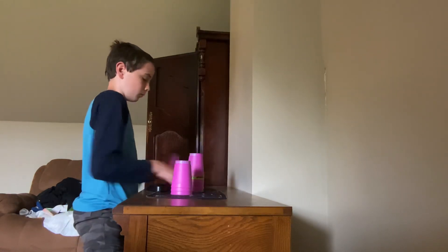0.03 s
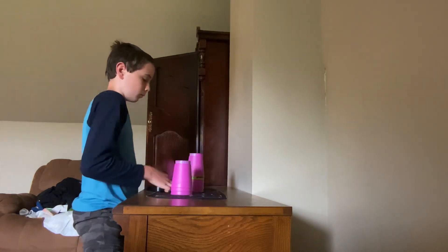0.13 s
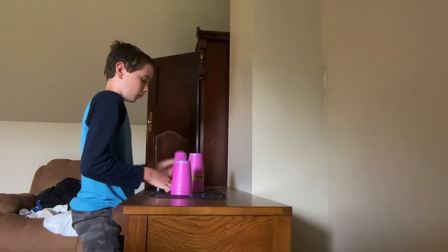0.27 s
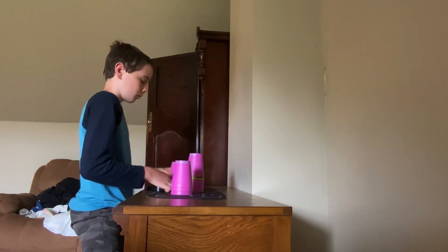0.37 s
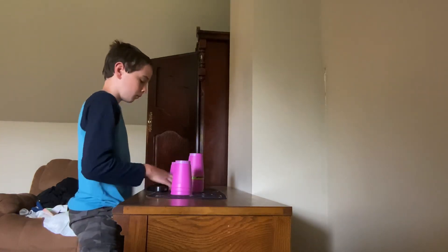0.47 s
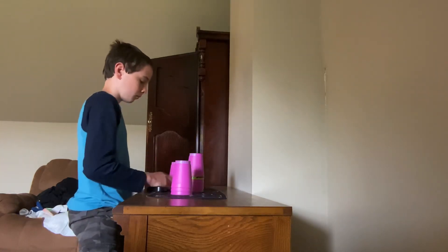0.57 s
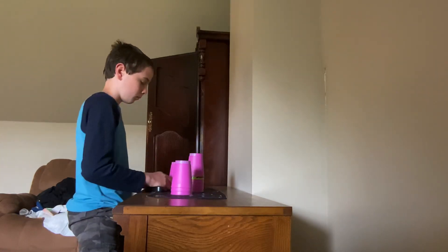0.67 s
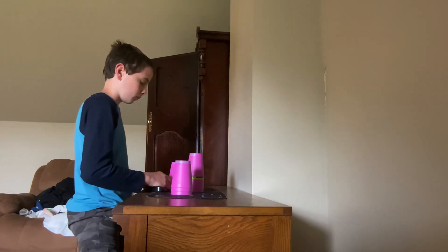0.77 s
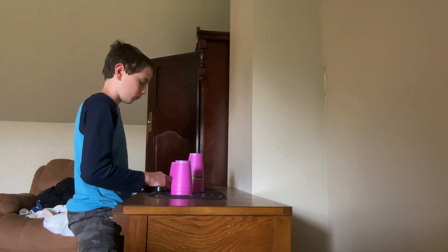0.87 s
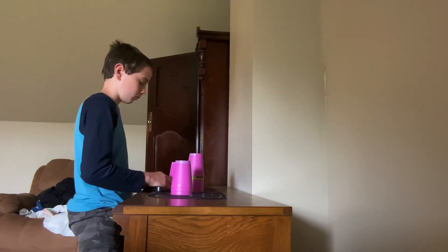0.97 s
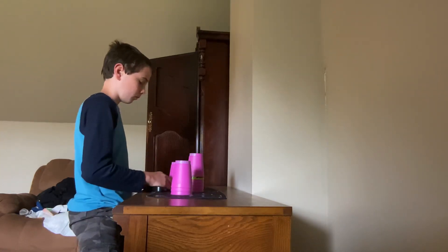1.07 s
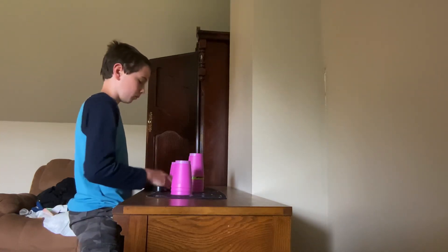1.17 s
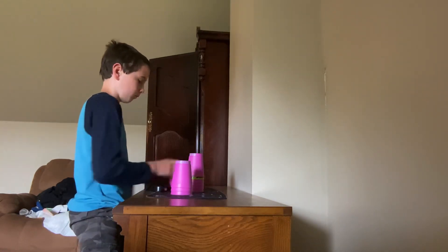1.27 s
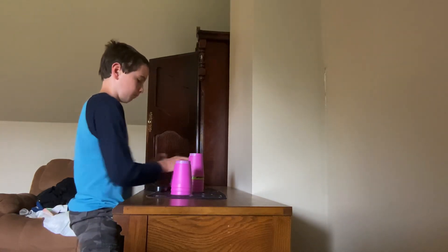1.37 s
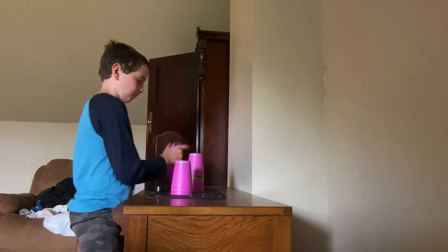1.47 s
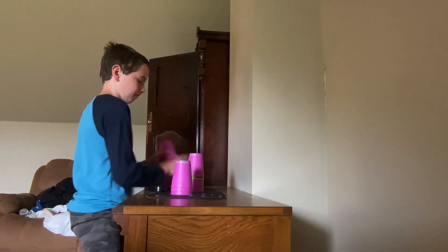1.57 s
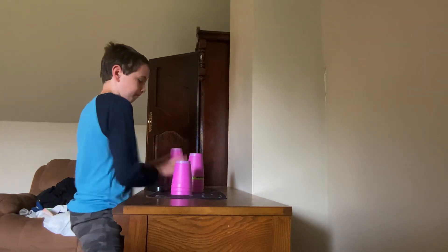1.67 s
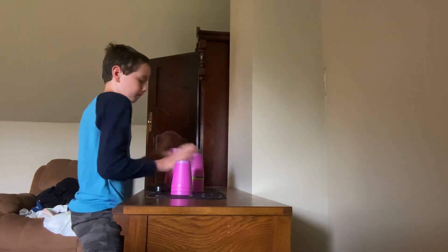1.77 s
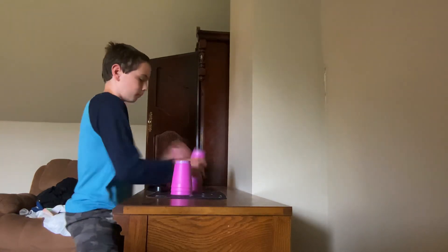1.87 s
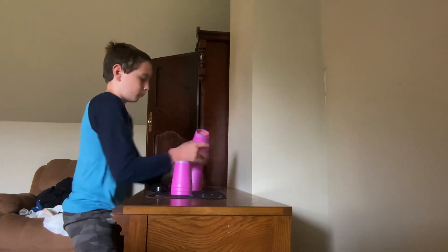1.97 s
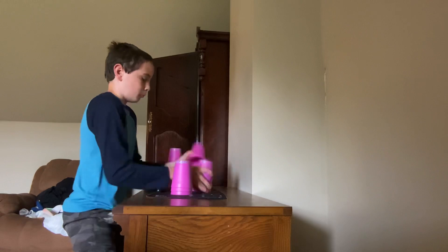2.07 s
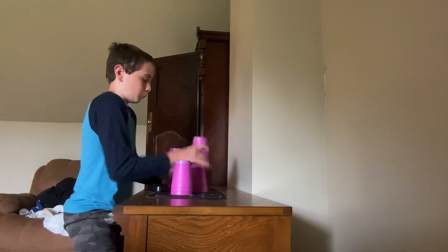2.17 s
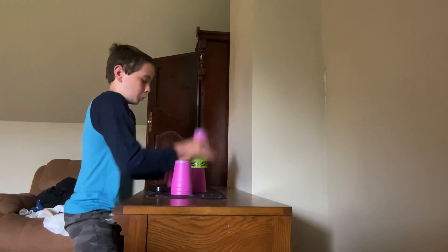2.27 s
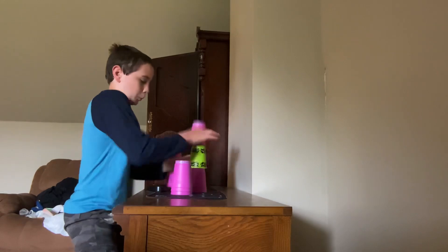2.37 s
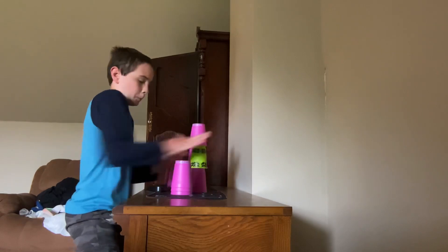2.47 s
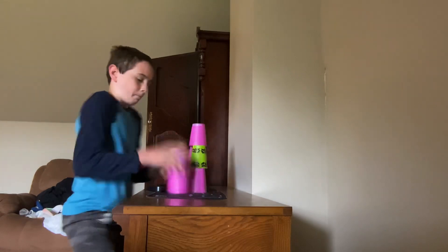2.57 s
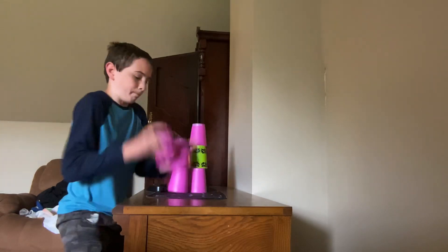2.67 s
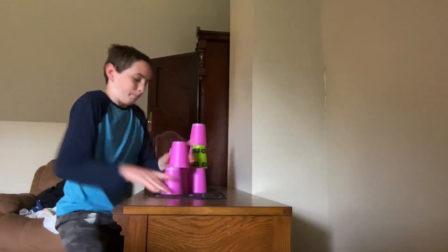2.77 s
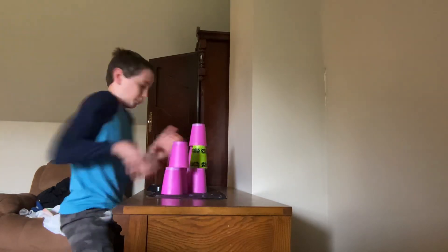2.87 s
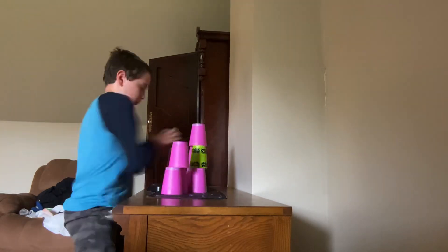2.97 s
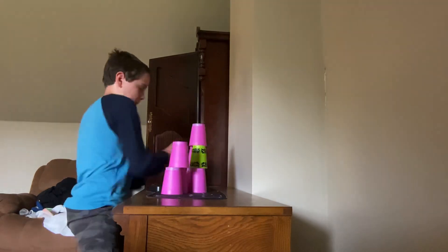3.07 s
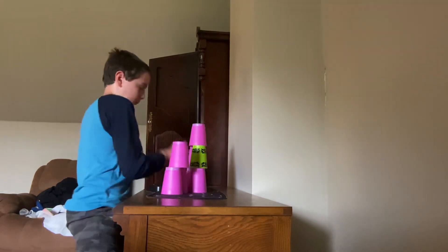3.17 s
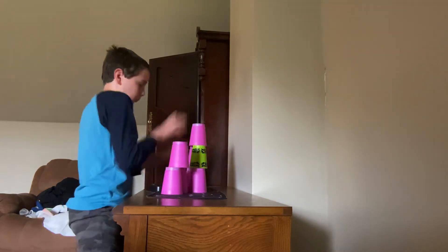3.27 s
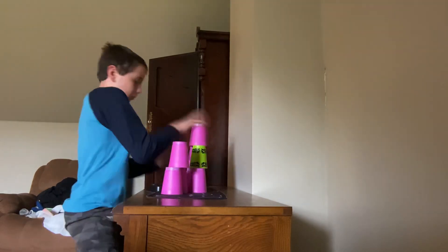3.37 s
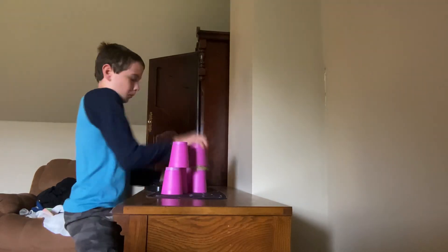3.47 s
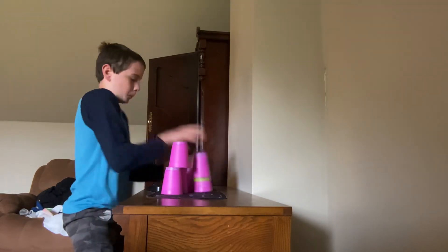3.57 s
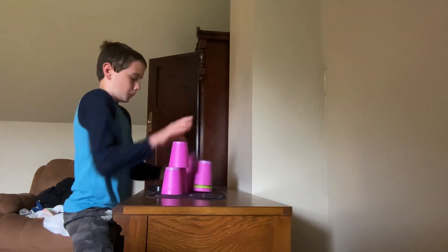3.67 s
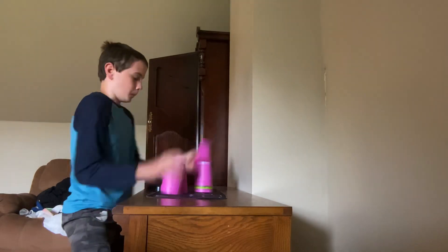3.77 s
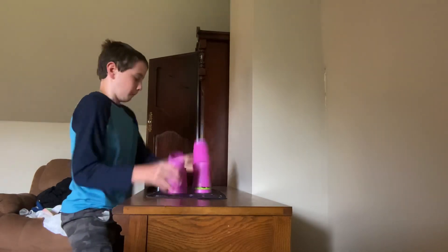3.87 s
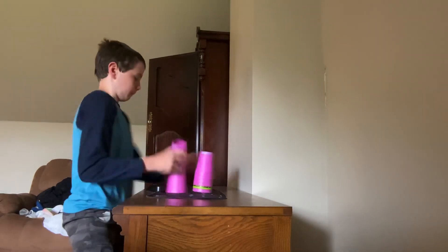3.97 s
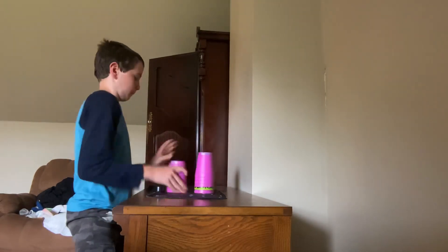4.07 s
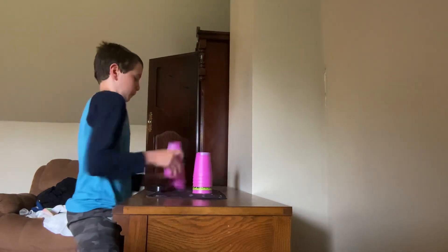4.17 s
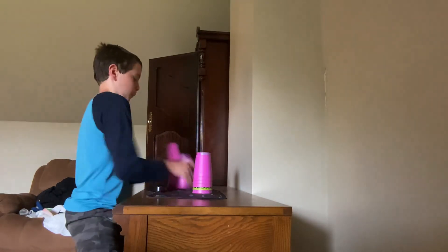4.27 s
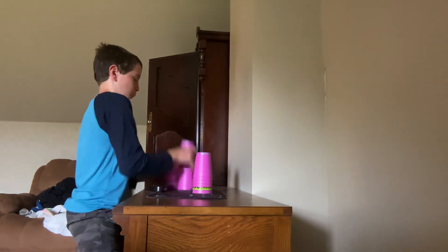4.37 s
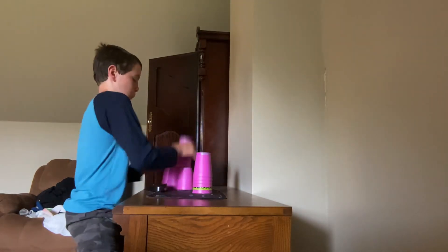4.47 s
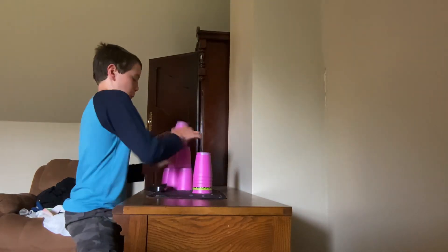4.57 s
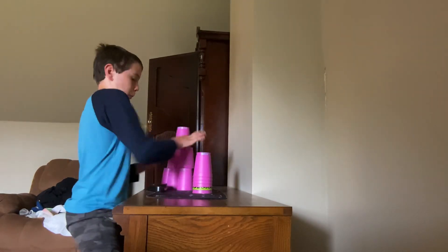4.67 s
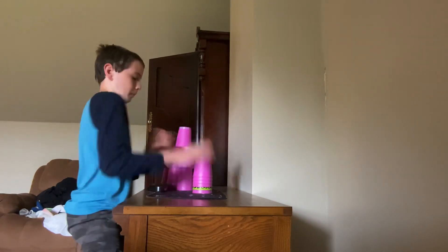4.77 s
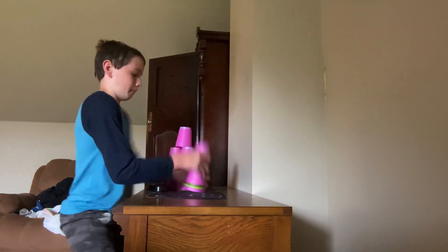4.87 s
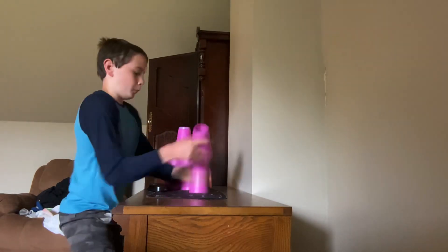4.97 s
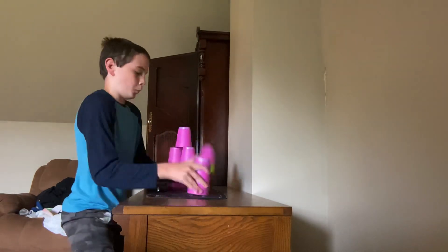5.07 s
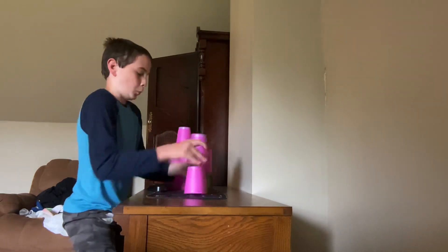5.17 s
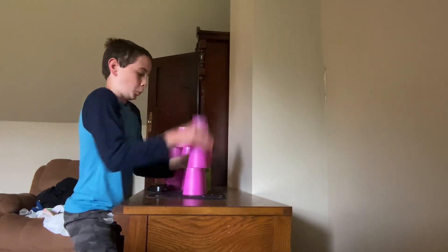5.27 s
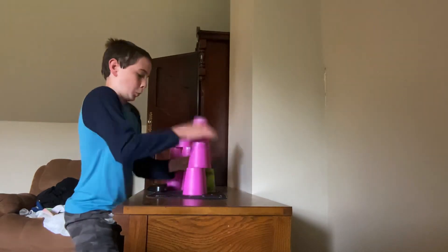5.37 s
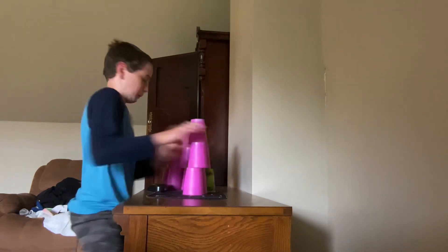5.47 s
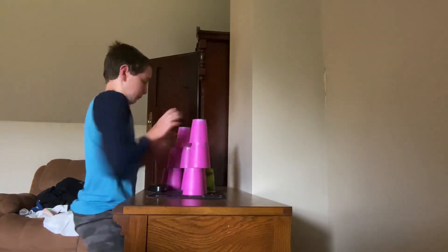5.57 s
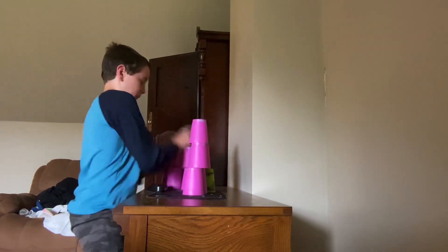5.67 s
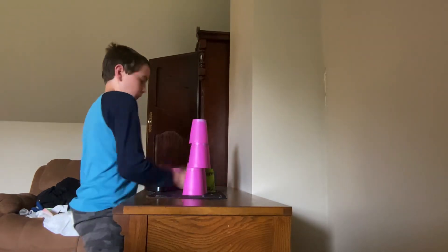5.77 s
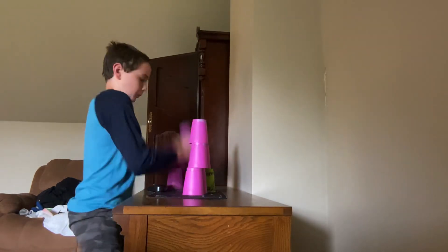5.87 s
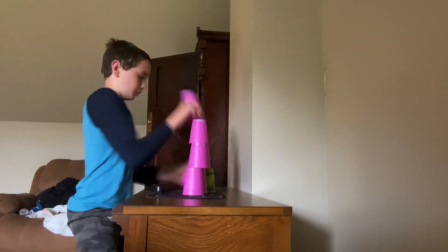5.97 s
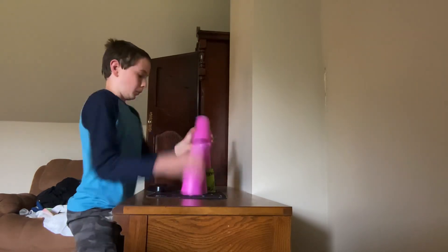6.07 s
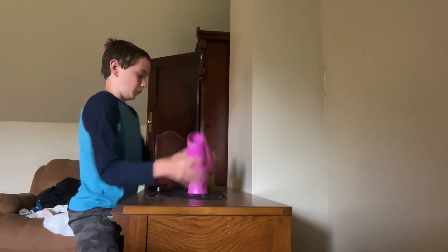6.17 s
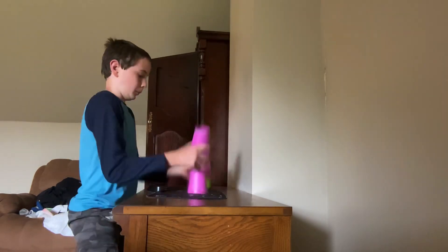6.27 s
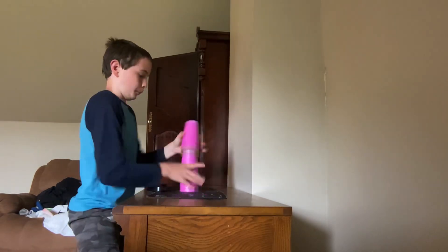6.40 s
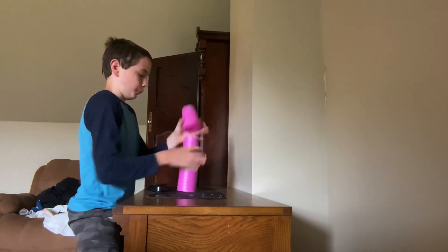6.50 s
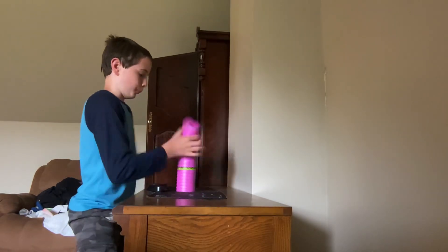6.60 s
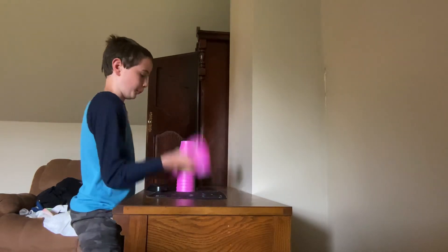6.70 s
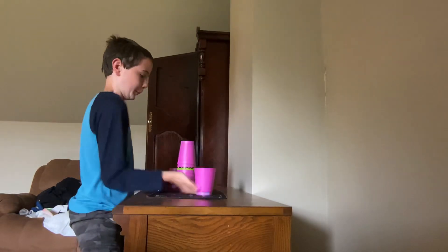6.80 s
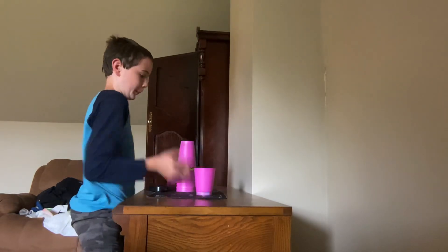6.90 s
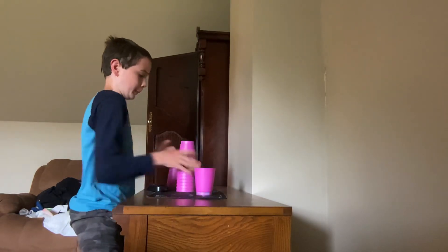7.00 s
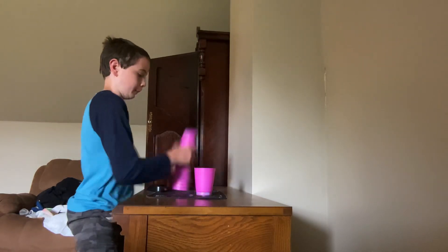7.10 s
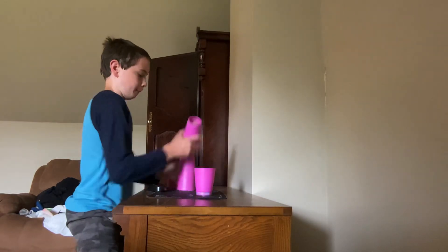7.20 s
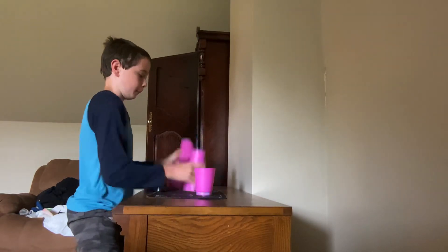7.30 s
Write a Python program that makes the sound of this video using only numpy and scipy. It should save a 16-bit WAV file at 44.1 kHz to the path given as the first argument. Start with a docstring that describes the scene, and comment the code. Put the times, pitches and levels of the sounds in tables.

```python
"""Plastic cups click, clack and thud as they are stacked into pyramids and swept down again.
They stand on a mat on a wooden cabinet in a small live room. Each contact is a short chatter of rims:
a bright click, a clack of the cup walls and a pop of the air inside. Cups and hands landing on the mat
thud into the cabinet. A wall close by throws it all back at a small microphone."""
import sys
import numpy as np
from scipy import signal
from scipy.fft import rfft, irfft
from scipy.io import wavfile
from scipy.ndimage import uniform_filter1d

SR = 44100
rng = np.random.default_rng(int(sys.argv[2]) if len(sys.argv) > 2 else 0)


def write(x):
    x = np.atleast_2d(x).T
    wavfile.write(sys.argv[1], SR, np.round(np.clip(x, -1, 1) * 32767).astype(np.int16))


N = 323694
RUB_LEAD_S = .012  # rims rub this long before they meet
MIDDLE_HZ = 1000  # note of a contact of middling stiffness

# cups set down on the mat: t/s, click level/dB, body level/dB, note f/Hz, thud level/dB
LANDINGS = [(.002, -35, -27, 1330, -23.5), (0.1089, -14, -24.5, 1970, -18),
            (0.2956, -25.5, -37, 500, -24.5), (0.3141, -37, -28, 443, -23), (0.4006, -28, -28, 1820, -29),
            (.583, -45, -38.5, 1720, -34), (1.256, -58, -45, 1510, -46.5),
            (1.3142, -54.5, -48.5, 1510, -42), (1.515, -31, -37, 960, -30.5), (1.637, -45, -24, 440, -20),
            (1.689, -27.5, -17.5, 840, -24.5), (1.883, -37.5, -48, 1400, -35), (2.2868, -31, -21, 904, -23),
            (2.419, -21.5, -17.5, 1140, -26.5), (2.5869, -34, -43, 520, -21),
            (2.6393, -23, -22, 1900, -25.5), (2.76, -26.5, -12, 1995, -12.5), (2.79, -34, -12.5, 780, -23),
            (3.081, -28, -24.5, 436, -19), (3.4245, -39, -32.5, 449, -21), (3.5527, -12.5, -19, 1820, -21),
            (3.689, -22.5, -23.5, 684, -28), (3.83, -12.5, -20.5, 3960, -16),
            (3.883, -21.5, -20.5, 2010, -18.5), (4.084, -23, -24.5, 470, -17.5),
            (4.334, -30, -20, 712, -24.5), (4.427, -33.5, -35.5, 440, -22.5),
            (4.592, -35.5, -23.5, 716, -29), (4.636, -21, -16, 1180, -23.5), (4.8644, -37, -44, 453.6, -33),
            (4.9717, -37, -32, 656, -33.5), (5.1086, -30.5, -24, 465, -15.5),
            (5.259, -33.5, -22.5, 640, -25), (5.381, -27.5, -19, 520, -23),
            (5.415, -15.5, -14, 1355, -20.5), (5.8046, -11.5, -17, 1750, -13),
            (6.028, -17.5, -12.5, 549, -12), (6.063, -19, -15, 1840, -38), (6.1315, -13.5, -22.5, 1290, -6),
            (6.3549, -28.5, -17.5, 546, -25.5), (6.8055, -34, -22, 893, -14),
            (7.066, -43, -56.5, 1790, -35.5), (7.2, -44, -35, 463, -31.5)]
# cups dropped squarely over another: t/s, click level/dB, body level/dB, note f/Hz, thud level/dB
NESTINGS = [(1.9702, -26.5, -30, 1840, -35), (2.114, -18.5, -19.5, 1920, -21.5),
            (3.511, -18, -17.5, 1700, -25), (3.731, -20, -27, 4100, -30), (3.9908, -23.5, -25.5, 1486, -21),
            (6.272, -17.5, -21, 1480, -21.5), (6.398, -16.5, -22, 1730, -18.5),
            (6.5631, -25, -19.5, 1510, -28)]


def gain_of(db):
    """Decibels to amplitude."""
    return 10 ** (np.asarray(db) / 20)


def clock(seconds):
    """Sample times from zero."""
    return np.arange(int(seconds * SR)) / SR


def unit(x):
    """Scales a sound to an energy of one."""
    return x / np.sqrt(np.sum(x ** 2) + 1e-20)


def curve_at(points, hz):
    """Reads a table along a logarithmic frequency axis."""
    f, value = np.transpose(points)
    return np.interp(np.log(hz + 1), np.log(f + 1), value)


def add(mix, s, sound):
    """Mixes a sound in at time s."""
    part = mix[max(0, round(s * SR)):][:len(sound)]
    part += sound[:len(part)]


def room_tone(level_db=-76.5):
    """The faint, steady air of the room."""
    # spectrum of the quiet room: f/Hz, level/dB
    air = [(30, -4.5), (100, -1), (200, -1.5), (300, -7), (420, -1.5), (520, -13), (1000, -16), (3000, -17),
           (16000, -40.5)]
    colour = gain_of(curve_at(air, np.fft.rfftfreq(N, 1 / SR)))
    noise = irfft(rfft(rng.standard_normal(N)) * colour, N)
    return gain_of(level_db) * unit(noise) * np.sqrt(N)


def room_tail(onset_s=0.01, build_s=0.0036):
    """Dense reflections build up quickly in the small room; each band dies at its own speed."""
    # reverberation time: f/Hz, t60/s
    reverberation = [(120, 0.35), (320, 0.34), (840, 0.45), (2200, 0.45), (5800, 0.54), (11000, 0.32),
                     (16000, 0.32)]
    t = clock(.42)
    hz, age, bands = signal.stft(rng.standard_normal(len(t)), SR, nperseg=256)
    fade = np.exp(-np.log(1000) * age / curve_at(reverberation, hz)[:, None])
    tail = signal.istft(bands * fade, SR, nperseg=256)[1][:len(t)]
    return tail * (1 - np.exp(-np.maximum(t - onset_s, 0) / build_s))


def at_microphone(sound, tails, wet_db, shift_s=.00022):
    """A sound arrives by its first paths, which shift with the cup's place, and by one of the tails."""
    # first paths, the near wall's echo stronger than the direct sound: delay/s, level/dB
    paths = [(0, 1.5), (.0026, -1), (.0062, 8.5), (.0075, -3.5), (.0098, -14.5), (.0165, -1.5)]
    tail = tails[rng.integers(len(tails))]
    reverb = gain_of(wet_db) * unit(signal.fftconvolve(np.float32(sound), tail))
    early = np.zeros(len(reverb))
    for delay, db in paths:
        add(early, delay + shift_s * rng.standard_normal(), gain_of(db) * sound)
    return (reverb + unit(early)) * np.sqrt(SR / 100)  # early part: the energy of 10 ms at full scale


def ring(modes, centre_hz, octaves, detune, t):
    """Rings the modes of an object; a blow favours those around its centre frequency."""
    hz, db, t60 = np.transpose(modes)[:, :, None]
    weight = np.exp(-.5 * (np.log2(hz / centre_hz) / octaves) ** 2) * rng.choice([-1, 1], hz.shape)
    hz = hz * (1 + detune * rng.standard_normal(hz.shape))
    return (weight * gain_of(db) * np.exp(-np.log(1000) * t / t60) * np.sin(2 * np.pi * hz * t)).sum(0)


def thuds(lag_s=.004, cup_hz=230.4, hand_hz=195):
    """Every push on the mat, by a hand or just after a rim touches: t/s, level/dB, centre f/Hz."""
    # hands coming down on the mat: t/s, level/dB
    pats = [(0.14, -29.5), (1.416, -47.5), (3.258, -22.5), (3.757, -23.5), (4.212, -26), (4.457, -31),
            (5.596, -36), (5.703, -22.5), (5.956, -24.5), (6.152, -13.5), (6.655, -33.5)]
    drops = [(s + lag_s, db, cup_hz * (hz / MIDDLE_HZ) ** -0.085)
             for s, _, _, hz, db in LANDINGS + NESTINGS]
    return drops + [(s, db, hand_hz) for s, db in pats]


def cabinet(tails, soft_s=0.0031, null_hz=102, null_q=2.5):
    """The mat softens each landing to a thud of the wooden top."""
    # modes of the cabinet: f/Hz, level/dB, t60/s
    wood_modes = [(72.5, -18.5, 0.49), (129, -23.5, 0.078), (160.5, 1.5, 0.16), (170.8, -0.5, 0.11),
                  (205.3, 1.5, 0.055), (248.6, -0.5, 0.056), (260, -3, 0.036), (296, -8.5, 0.058),
                  (339.6, -4, 0.059), (409.7, 6.5, 0.044), (467.4, -5.5, 0.15)]
    out, t = np.zeros(N), clock(.15)
    for s, db, centre_hz in thuds():
        wood = ring(wood_modes, centre_hz, octaves=0.85, detune=0.033, t=t) * (1 - np.exp(-t / soft_s))
        add(out, s, gain_of(db) * at_microphone(wood, tails, wet_db=-4.0))
    # the room carries little in the gap between its two lowest resonances
    return signal.lfilter(*signal.iirnotch(null_hz, null_q, SR), out)


def contact(s, click_db, body_db, note_hz, decay_s=None, hollow_db=0):
    """The stiffer the contact, the higher its note, the brighter its clack and the shorter its chatter."""
    stiffness = note_hz / MIDDLE_HZ
    if decay_s is None:
        decay_s = 0.0031 * stiffness ** -0.74
    clack_hz = 1020 * stiffness ** 0.37
    pop_db = body_db - 1.2 + 0.9 * np.log2(stiffness) + hollow_db
    return s, decay_s, click_db, body_db, clack_hz, pop_db, note_hz


def finger_ticks(per_s=14, spread_db=4, note_hz=1320, octaves=0.53):
    """Cups tick faintly in the fingers, at loosely spaced moments."""
    # spells of quick handling: start t/s, end t/s
    handling = [(1.849, 2.63), (3.101, 4.3), (4.42, 4.8), (5.7, 6.39)]
    for start, end in handling:
        for k, (late, level, pitch) in enumerate(rng.standard_normal((24, 3))):
            s = start + (k + .5 + .25 * late) / per_s
            db = spread_db * level
            if s < end:
                yield contact(s, db - 40.5, db - 40, note_hz * 2 ** (octaves * pitch))


def contacts():
    """Every touch of a rim; a cup dropped over another hardly chatters, and its air pops louder."""
    # cups sliding into or out of one another: t/s, decay/s, scrape level/dB, body level/dB, note f/Hz
    slides = [(.004, 0.084, -32.5, -31, 1290), (.07, 0.061, -23, -28.5, 835), (.13, 0.011, -22, -29, 570),
              (1.225, .04, -67, -64, 1500), (1.366, 0.1, -54, -57, 1860), (1.486, 0.0087, -30, -32.5, 1970),
              (1.567, 0.017, -36, -44, 1400), (1.669, 0.011, -20, -20, 1150), (1.73, .01, -36, -27, 673),
              (2.737, .013, -56, -33, 467), (3.127, .004, -34.5, -34.5, 700),
              (3.145, 0.014, -28.5, -46, 820), (3.253, 0.023, -17, -21, 2120),
              (3.4637, 0.0063, -23.5, -35, 870), (3.493, 0.0065, -22, -21, 1460),
              (3.572, 0.01, -17, -21, 990), (3.7941, 0.01, -22, -25.5, 1930),
              (5.125, 0.0087, -25.5, -19, 441), (5.689, 0.2, -27.5, -23, 610),
              (5.733, .022, -19, -25.5, 600), (5.752, 0.047, -17, -18.5, 1640),
              (5.945, .025, -24, -27, 694), (7.07, 0.053, -41.5, -42, 1722),
              (7.163, 0.024, -34.5, -33.5, 1750)]
    # cups knocking together in the hands: t/s, click level/dB, body level/dB, note f/Hz
    knocks = [(.2725, -38, -33, 586), (.417, -38, -33, 460), (2.3863, -34.5, -23.5, 593),
              (2.43, -25.5, -19.5, 1230), (2.6513, -27, -33, 820), (2.776, -20.5, -17, 464),
              (3.4521, -31, -29, 1090), (3.53, -37, -20, 440), (3.709, -24, -19, 1870),
              (4.005, -43, -20, 1560), (4.0416, -31, -39, 1350), (4.175, -40, -34, 2290),
              (4.4971, -36, -38, 1060), (4.5156, -40, -33, 1035), (4.6105, -33.5, -25, 710),
              (4.9087, -39.5, -48, 2140), (4.9412, -31.5, -31.5, 1840), (5.1575, -27, -21.5, 970),
              (5.205, -37, -35, 648), (5.325, -39, -29, 670), (5.43, -30, -20, 527),
              (5.782, -15.5, -20.5, 2160), (5.825, -25, -16.5, 600), (6.043, -22, -18.5, 640),
              (6.0995, -15.5, -19.5, 1930), (6.152, -33.5, -18, 397), (6.2108, -19.5, -21, 1510),
              (6.2852, -40, -25, 1430), (6.3381, -24.5, -27.5, 690), (6.452, -36, -35, 1487)]
    touches = [contact(*row[:4]) for row in LANDINGS]
    touches += [contact(*row[:4], decay_s=.0012, hollow_db=7.5) for row in NESTINGS]
    touches += [contact(s, scrape_db, body_db, hz, decay) for s, decay, scrape_db, body_db, hz in slides]
    return touches + [contact(*row) for row in knocks] + list(finger_ticks())


def whiten(burst, bins):
    """Evens out the broad colour of a burst, as hard impacts carry all pitches alike."""
    spectrum = np.fft.fft(burst)
    power = abs(uniform_filter1d(abs(spectrum) ** 2, bins, mode="wrap"))
    return np.fft.ifft(spectrum / np.sqrt(power + 1e-12)).real


def chatter(decay_s, grain_db=4, rub_db=-12, rub_s=0.0027, rattle_db=-21, rattle_s=0.012, size=4096):
    """Rims rub for a moment, meet, and settle in uneven micro-impacts and a faint rattle."""
    t = np.arange(size) / SR - RUB_LEAD_S
    slips = np.repeat(np.minimum(rng.exponential(1, size // 64), 3), 64)
    rub = gain_of(rub_db) * np.exp(-abs(t) / rub_s)
    settle = np.exp(-abs(t) / decay_s) + gain_of(rattle_db) * np.exp(-abs(t) / rattle_s)
    grains = rng.standard_normal(size) * gain_of(grain_db * slips)
    return whiten(grains * np.where(t < 0, rub, settle), bins=60)


def wander(force, patchy_db=3.0, size=128):
    """The touching point wanders round the rim, so a scrape changes colour every few milliseconds."""
    bands = signal.stft(force, nperseg=size)[2]
    patches = uniform_filter1d(rng.standard_normal(bands.shape), 6, axis=0)
    patches = uniform_filter1d(patches, 2, axis=1)
    return signal.istft(bands * gain_of(patchy_db * patches / patches.std()), nperseg=size)[1]


def rim_click(size=1024):
    """A rim's bright, sharp-fronted answer to one impact, built with minimum phase."""
    # spectrum of the click: f/Hz, level/dB
    colour = [(300, -14), (1200, -10.5), (2200, 4.5), (2700, -3.5), (3200, 3), (4000, 2.5), (4800, -1),
              (5600, 0), (7000, -3), (9700, 1), (10550, 5), (11250, 6.5), (11800, -6.5), (12800, -1),
              (15800, -11)]
    log_gain = np.log(gain_of(curve_at(colour, abs(np.fft.fftfreq(size, 1 / SR)))))
    return np.fft.ifft(np.exp(np.conj(signal.hilbert(log_gain)))).real[:size // 2]


def wall_clack(centre_hz, t, lowest_hz=230):
    """The cup walls ring; a small cup radiates no bass, and a soft touch leaves its high modes still."""
    # modes of the cup walls: f/Hz, level/dB, t60/s
    wall_modes = [(476, 7.5, 0.028), (551, 2.5, 0.04), (619, 3.5, 0.043), (723, -1.5, 0.07),
                  (852, -7.5, 0.068), (930, 1.5, 0.023), (1081, 1.5, 0.022), (1257, -2, 0.029),
                  (1455, 0, 0.027), (1680, -2.5, 0.043), (1858, 9, 0.01), (2068, -0.5, 0.019),
                  (2270, -7, 0.021), (2620, 7.5, 0.0083)]
    walls = ring(wall_modes, centre_hz, octaves=1.0, detune=0.039, t=t)
    return signal.lfilter(*signal.butter(2, [lowest_hz, 2.12 * centre_hz], "band", fs=SR), walls)


def air_pop(hz, t, q=7.7):
    """One strong note, mostly of the air in the cup, swells over a cycle and dies away."""
    cycles = hz * t
    return (1 - np.exp(-cycles)) * np.exp(-np.pi * cycles / q) * np.sin(2 * np.pi * cycles)


def cups(tails):
    """Each chatter of rims drives a click, a clack and a pop."""
    out, t, rim = np.zeros(N + round(RUB_LEAD_S * SR)), clock(.05), rim_click()
    for s, decay_s, click_db, clack_db, clack_hz, pop_db, pop_hz in contacts():
        force = chatter(decay_s)
        clack = signal.fftconvolve(force, wall_clack(clack_hz, t))
        click = signal.fftconvolve(wander(force), rim)
        pop = signal.fftconvolve(force, air_pop(pop_hz, t))
        add(out, s, gain_of(click_db) * at_microphone(click, tails, wet_db=-4.0))
        add(out, s, gain_of(clack_db) * at_microphone(clack, tails, wet_db=-2))
        add(out, s, gain_of(pop_db) * at_microphone(pop, tails, wet_db=-5.5))
    return out[-N:]  # drops the lead, so the rims meet at the listed times


def scene():
    """Cups move about the mat, so their sounds take different ways round the room to one microphone."""
    tails = np.float32([room_tail() for _ in range(16)])
    return (room_tone() + cabinet(tails) + cups(tails))[None]


def record(dry, low_cut_hz=58, top_hz=15900):
    """A small microphone loses the deep bass and rounds off the loudest peaks; the very top is cut."""
    thin = signal.sosfilt(signal.butter(3, low_cut_hz, "high", fs=SR, output="sos"), dry)
    rounded = thin / (1 + thin ** 6) ** (1 / 6)
    band_limit = signal.firwin(511, top_hz, window=("kaiser", 9), fs=SR)
    return signal.oaconvolve(rounded, band_limit[None], "same")


dry = scene()
out = record(dry)
write(out)
```